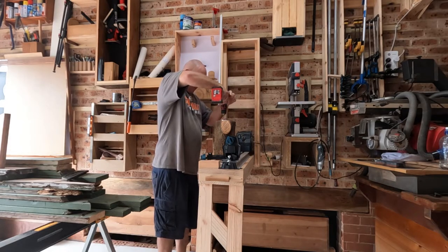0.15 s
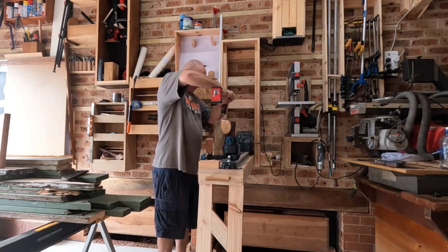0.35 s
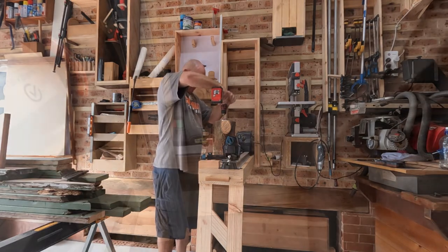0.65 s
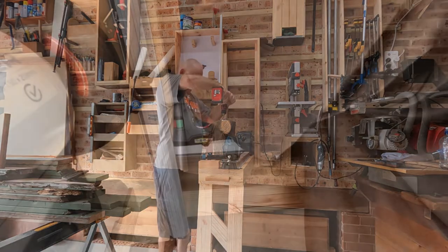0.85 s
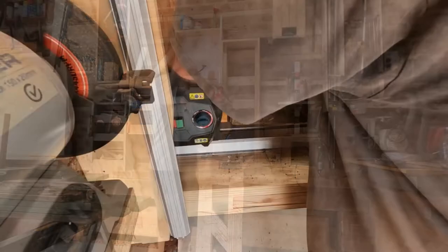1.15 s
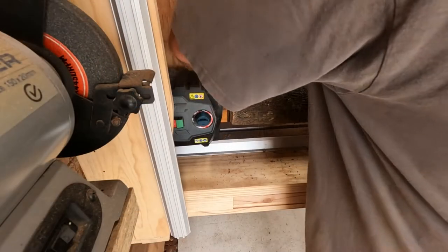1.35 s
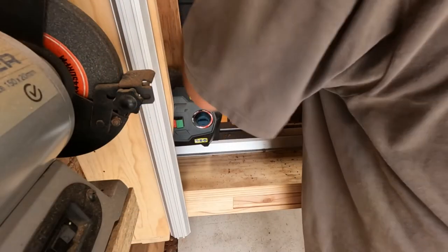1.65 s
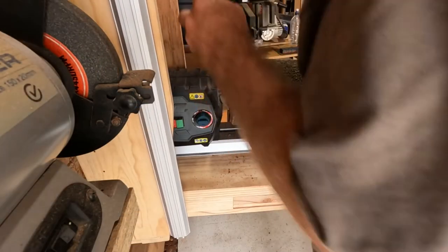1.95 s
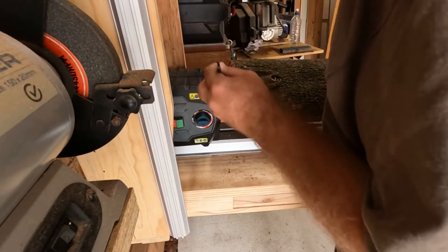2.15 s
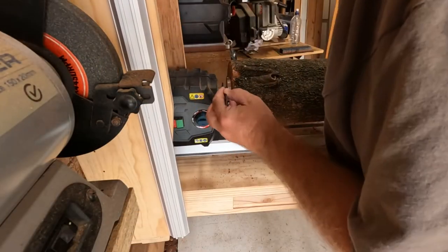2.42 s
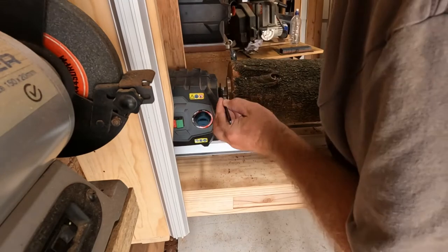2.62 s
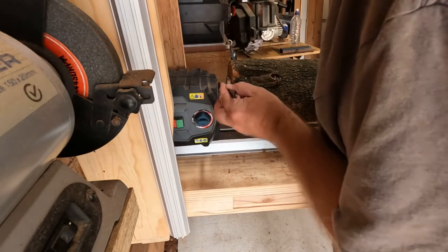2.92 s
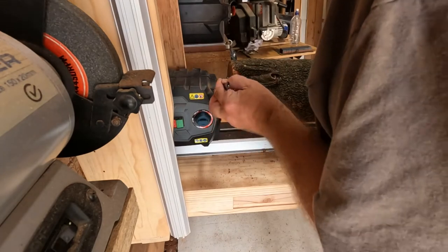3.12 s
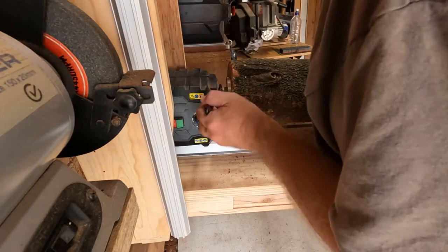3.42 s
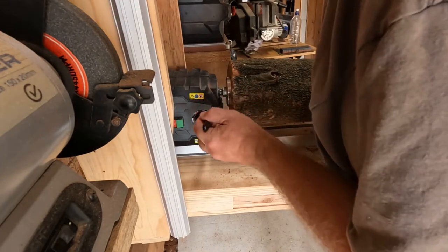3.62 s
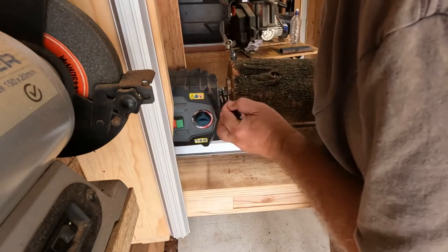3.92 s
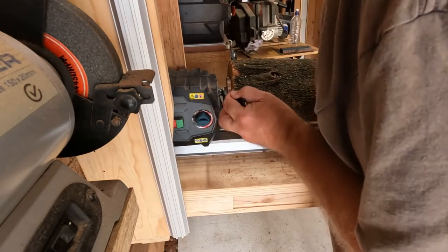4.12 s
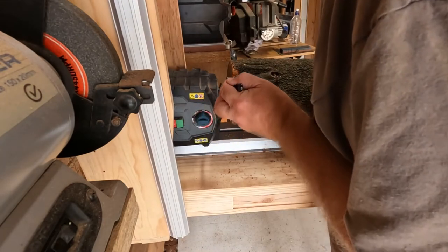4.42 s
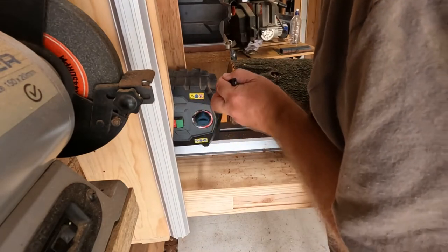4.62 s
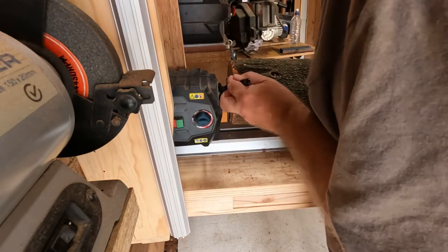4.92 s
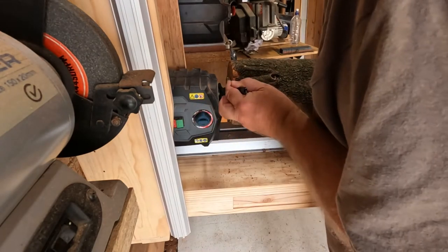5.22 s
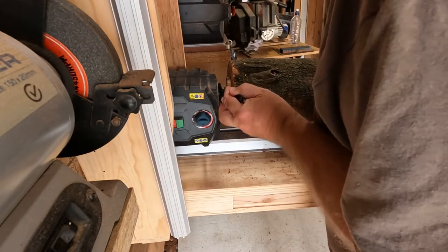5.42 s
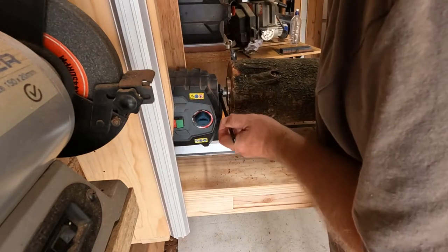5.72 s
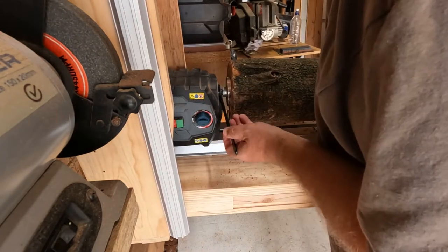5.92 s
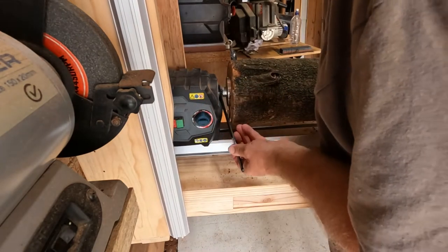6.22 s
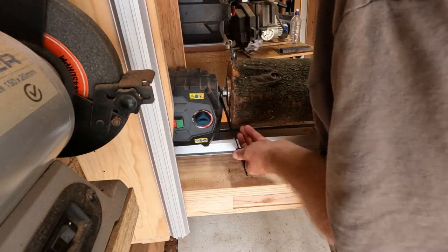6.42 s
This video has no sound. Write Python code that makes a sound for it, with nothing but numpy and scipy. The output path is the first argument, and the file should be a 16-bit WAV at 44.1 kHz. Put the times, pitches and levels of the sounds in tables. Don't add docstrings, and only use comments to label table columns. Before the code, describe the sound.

Irregular clunks, clicks and ringing metal taps on a timber bench, mixed with dry scraping and sliding over a low room rumble.

```python
import sys
import numpy as np
from scipy import signal
from scipy.fft import rfft, irfft, next_fast_len
from scipy.io import wavfile
from scipy.ndimage import uniform_filter1d, map_coordinates

SR = 44100
rng = np.random.default_rng(int(sys.argv[2]) if len(sys.argv) > 2 else 0)


def materialize(psi):
    bounded = np.clip(np.atleast_2d(psi).T, -1, 1)
    quanta = np.round(bounded * 32767).astype(np.int16)
    wavfile.write(sys.argv[1], SR, quanta)


def ratio(d):
    e = np.asarray(d, float) / 20
    return 10 ** e


N = 289296


def unit(x):
    return x / np.sqrt(np.mean(x ** 2) + 1e-20)


def along(points, hz):
    f, v = np.transpose(points)
    return np.interp(np.log(hz + 1), np.log(f + 1), v)


def gains(rows):
    s, *cols = np.transpose(rows)
    s = np.r_[s[0] - 0.012, s, s[-1] + 0.02]
    t = np.arange(N) / SR
    return np.array([np.interp(t, s, np.r_[0, ratio(c), 0]) for c in cols])


def wobble(rate_hz):
    knots = rng.standard_normal(int(N * rate_hz / SR) + 4)
    return map_coordinates(knots, [np.arange(N) * rate_hz / SR])


def stroke(s, attack_s, hold_s, release_s):
    corners_s = np.cumsum([s, attack_s, hold_s, release_s])
    return np.interp(np.arange(N) / SR, corners_s, [0, 1, 1, 0]) ** 2


def filtered(x, response):
    m = next_fast_len(N + SR // 2)
    return irfft(rfft(x, m) * response(np.fft.rfftfreq(m, 1 / SR)), m)[..., :N]


def treble(x, hz):
    return signal.sosfilt(signal.butter(3, hz, "high", fs=SR, output="sos"), x)


def ring(modes, scatter_db, size=4500):
    hz, db, t60_s = np.transpose(modes)[:, :, None]
    sign = (-1) ** np.arange(len(modes))[:, None]
    t = np.arange(size) / SR
    strength_db = db + scatter_db * rng.standard_normal(hz.shape)
    build_up = 1 - np.exp(-t * hz / 1.26)
    decay = ratio(strength_db - 60 * t / t60_s) * build_up
    return np.sum(sign * decay * np.sin(2 * np.pi * hz * t), axis=0)


# t/s, casing peak level/dB, board level/dB, casing f/Hz at the spot struck
KNOCKS = [(0.631, -37.5, -19, 805), (0.809, -21.5, 3.5, 875), (0.961, -9, -5.5, 882),
          (1.073, -28, -14, 850), (1.136, -21, 0, 873), (1.203, -15, -6.5, 750), (1.593, -23, -19, 1190),
          (1.612, -19.5, -5, 900), (1.625, -25.5, -2, 860), (1.641, -25.5, -8, 886),
          (1.777, -43.5, 2.5, 776), (2.366, -11, -5.5, 1403), (2.39, -21, -17, 940), (2.428, -21.5, 1, 746),
          (3.054, -32.5, -6, 1020), (3.419, -25, 6, 280), (3.539, -6.5, -7.5, 1430), (3.962, -27, -12, 820),
          (4.412, -32, -7.5, 535), (4.423, -28, -4.5, 534), (4.435, -25, -9, 985), (4.605, -35, -8, 800),
          (4.712, -27, -13, 1430), (4.85, -32, -8, 1460), (4.013, -36, -8, 756), (4.035, -37.5, -7, 900),
          (2.878, -33, -8, 940), (3.01, -38, -8, 1050), (4.255, -25, -8, 675), (4.505, -17, -2.5, 815),
          (4.627, -17, -18, 1436), (4.705, -23.5, -6, 805), (4.804, -27, -8, 790),
          (4.809, -26.5, -12, 1430), (4.824, -31.5, 1, 814), (5.66, -33.5, -3, 700)]
# t/s, casing peak level/dB, board level/dB, hardness/dB, casing f/Hz at the spot struck
RAPS = [(0.589, -29, -12.5, -9, 1420), (0.827, -17, 0, -13, 900), (0.999, -16, -14, -10, 1020),
        (1.291, -29, 0, -12, 810), (2.588, -28.5, -11, -13, 1010), (2.835, -13, -4.5, -7, 1384),
        (3.115, -12, -13.5, -6, 1123), (3.12, -10.5, -19, -8, 1110), (3.455, -32.5, -14, -5, 1130),
        (3.5, -20.5, -23, 3.5, 1460), (3.513, -34.5, -15, 9.5, 1450), (3.645, -11.5, -13, -6, 1543),
        (3.771, -35.5, -1, 9.5, 1430), (3.785, -19.5, -29, -4, 1006), (4.096, -38, -5, -6.5, 1500),
        (4.234, -25, 0, -11, 1093), (4.24, -26.5, -8, -3.5, 1070), (4.751, -32, -26, -16, 790),
        (4.786, -34.5, -20, -7, 1910), (4.88, -39, 0, -9, 885), (5.157, -39, -21, -11, 710),
        (5.206, -36, -15, -6, 1900), (5.792, -40, -16, -5.5, 1410), (5.889, -46.5, 1, -2, 716),
        (6.004, -43, -5, -5.5, 1430), (6.204, -44.5, -7, 0, 1430), (5.826, -43, -1, -7.5, 516)]
# f/Hz, level/dB, t60/s
BOARD = [(190.6, -21, 0.15), (264.5, -9.5, 0.085), (299, -2.5, 0.057), (378.7, 5.5, 0.073),
         (441, -6, 0.036), (529.4, -4.5, 0.082)]
CASING = [(662, -21.5, 0.053), (804.7, -1.5, 0.057), (967, 1.5, 0.023), (1089, -3.5, 0.038),
          (1222, -2.5, 0.021), (1430, -0.5, 0.024), (1747, -8.5, 0.024)]
EDGE = [(1875, -5.5, 0.036), (2009, -0.5, 0.029), (2150, -1.5, 0.03), (2390, 4, 0.02), (2710, 4, 0.016),
        (2981, -8, 0.04), (3230, -0.5, 0.016), (3538, -12, 0.025), (3864, -1.5, .018), (4380, -15, 0.017),
        (4620, -14, 0.023)]
WOOD_EDGE_DB, WOOD_TICK_DB = -19.5, -42
STEEL_TICK_DB, TICK_GROWS = -12, 1.8


def knocks():
    out, t = np.zeros(N + SR), np.arange(3000) / SR
    blows = [(s, db, board_db, WOOD_EDGE_DB, WOOD_TICK_DB, hz) for s, db, board_db, hz in KNOCKS]
    for s, db, board_db, hard_db, hz in RAPS:
        blows.append((s, db, board_db, hard_db, STEEL_TICK_DB + TICK_GROWS * hard_db, hz))
    for s, db, board_db, edge_db, tick_db, spot_hz in sorted(blows):
        contact = rng.standard_normal(len(t)) * np.exp(-t / 0.0038) * (1 - np.exp(-t / 0.0006))
        contact[20] = 2.5
        casing = CASING + [(spot_hz, 7, 0.035)]
        parts = [signal.fftconvolve(contact, ring(p, scatter_db=2.0)) for p in (BOARD, casing, EDGE)]
        tick = treble(uniform_filter1d(contact, size=3, origin=1), hz=4360)
        parts.append(np.pad(tick, (0, len(parts[0]) - len(t))))
        levels_db = (board_db + 2.0, 1.5, edge_db + 7.5, tick_db + 20.5)
        start = round((s - 0.002) * SR)
        for part, rel_db in zip(parts, levels_db):
            out[start:][:len(part)] += ratio(db + rel_db) * part / np.abs(part).max()
    return out[:N]


# f/Hz, level/dB, t60/s
CRANK = [(1860, 0, 0.062), (2093, 3, 0.063), (2557, 7, 0.13), (3000, -5.5, 0.11), (3510, 1.5, 0.14),
         (3680, -2, 0.13), (4340, -6.5, 0.23)]
SPINDLE = [(4850, 6, 0.07), (6310, -3, 0.11), (6880, -25, 0.05), (7400, -2, 0.14), (8350, -3, 0.1),
           (9400, -12, .1), (10060, -3, 0.11), (10200, -5, 0.2), (10500, -1, 0.078), (10970, -8, .1),
           (11700, -9, .12), (12600, -6, .08), (6530, -11, .15)]
# t/s, level/dB, f/Hz of the spot struck, answering width/octaves, t60 factor (1 = loosely held)
TAPS = [(.588, -37, 2560, .1, .25), (0.587, -43.5, 4850, .1, .45), (1, -25, 2600, .2, .2),
        (1.002, -32, 3900, .3, .15), (1.293, -39, 2560, .1, 0.2), (1.57, -30, 1880, .08, 1.2),
        (1.629, -30, 3800, 0.3, .3), (1.618, -32, 3950, 0.29, .2), (1.64, -29.5, 3700, .3, 0.28),
        (1.779, -51, 7900, .25, 1.1), (2.366, -10, 2054, 0.087, 0.18), (2.421, -34, 2980, .1, 1.0),
        (2.42, -34.5, 8500, 0.58, 0.39), (1.603, -34, 3920, 0.3, 0.22), (3.116, -7, 3000, 0.32, 0.21),
        (3.418, -49, 7400, .4, 1.0), (3.499, -22, 2590, 0.072, 0.88), (3.499, -13.5, 9700, 1.1, 0.78),
        (3.644, -2.5, 1930, 0.15, 0.27), (3.769, -29.5, 7100, 0.96, 1.3), (3.79, -29, 4344, .06, 1.4),
        (3.83, -42, 3510, 0.05, 3.3), (3.79, -44, 2300, .2, 3), (3.79, -47, 4850, .06, 2.8),
        (3.79, -40, 6600, .08, 2), (4.448, -34, 6170, .1, 0.43), (4.432, -35, 2400, .15, .5),
        (4.44, -38, 11100, .2, 0.61), (4.825, -42, 6300, .1, .4), (4.845, -30, 11900, .08, 0.8)]
REACH_DB = -19.5


def handle():
    out = np.zeros(N + SR)
    for s, db, spot_hz, octaves, free in TAPS:
        modes = []
        for hz, mode_db, t60_s in CRANK + SPINDLE:
            reach_db = REACH_DB * (np.log2(hz / spot_hz) / octaves) ** 2
            modes.append((hz, db + mode_db + reach_db, t60_s * free))
        out[round(s * SR):][:12000] += ring(modes, scatter_db=2.0, size=12000)
    return out[:N] * (0.8 + 0.6 * wobble(260))


def friction(parts, level, grit_db, lump_db):
    grit = rng.standard_normal(N) * ratio(grit_db * wobble(900) + lump_db * wobble(90))
    voices = [signal.fftconvolve(grit, ring(p, scatter_db=-1.0))[:N] for p in parts]
    hiss = filtered(treble(grit, hz=4200), lambda hz: ratio(-1.5 * np.log2(hz / 4000 + 0.1)))
    voices.append(hiss)
    return sum(g * unit(v) for g, v in zip(level, voices))


# t/s, length/s, casing level/dB, grit/dB
SCRAPES = [(0.599, 0.1, -48.5, 6.5), (0.84, 0.09, -50.5, 6.5), (1.004, 0.072, -42, 2),
           (1.062, 0.071, -36.5, 0.5), (1.25, 0.062, -50, 7), (1.281, 0.093, -41.5, -5.5),
           (1.559, 0.05, -35.5, 1.5), (1.613, 0.04, -37.5, 9), (0, 0.17, -55, 12), (2.323, 0.038, -53, -11),
           (2.411, 0.019, -33.5, 8), (2.423, 0.075, -43, -5), (2.543, 0.098, -42, -5),
           (2.84, 0.07, -45.5, 6.5), (3.398, 0.043, -47, -5), (3.444, 0.06, -40, 1),
           (3.495, 0.045, -29.5, 16.5), (3.56, 0.13, -32.5, 0), (3.646, 0.13, -40.5, 6),
           (3.773, 0.043, -28.5, 13), (3.988, .1, -49, -11), (4.23, 0.055, -35, -7), (4.41, 0.05, -35, 7.5),
           (4.721, .06, -43.5, 1), (4.855, .045, -42.5, 0.5), (4.584, 0.13, -43, -5.5),
           (4.697, 0.08, -40, -2.5), (4.767, 0.08, -37.5, 2.5), (4.825, 0.066, -38, 3.5),
           (5.194, 0.046, -47.5, -11), (5.77, 0.084, -44.5, 0), (4.27, 0.059, -52, 0)]
SCRAPE_DB = [0.5, 0, -7.5, -15.5]
GRIT_SHARE = [-0.42, -0.024, 0.28, 1.03]


def scrapes():
    level = np.zeros((4, N))
    for s, length_s, db, grit_db in SCRAPES:
        u = np.arange(round(length_s * SR)) / (length_s * SR)
        swell = np.sin(np.pi * u) ** 0.77
        part_db = db + np.add(SCRAPE_DB, np.multiply(GRIT_SHARE, grit_db))
        level[:, round(s * SR):][:, :len(swell)] += ratio(part_db)[:, None] * swell
    held = [[(hz, db * 0.6, t60_s * 0.69) for hz, db, t60_s in p] for p in (BOARD, CASING, EDGE)]
    return friction(held, level, grit_db=3.5, lump_db=1.7)


# t/s, rasp level/dB
DRAG = [
    (2.93, -58),
    (3.02, -56.5),
    (3.07, -54),
    (3.108, -32.5),
    (3.145, -34),
    (3.2, -37),
    (3.24, -47),
    (3.36, -68.5),
]
# f/Hz, level/dB, t60/s
RAIL = [
    [(188.6, 0, 0.066)],
    [(813, 7, 0.014), (1020, 3, 0.028), (1140, -1, 0.027), (1600, -19, .03)],
    [(2170, 0, 0.017), (2420, 1.5, 0.011), (2630, 2.5, 0.014), (3000, -7, 0.0093), (3300, -9, 0.011),
     (3860, -21, 0.0087), (4560, -3.5, 0.0077), (1780, -11, .015)],
]
DRAG_HISS_DB = -20
DRONE_S, DRONE_ATTACK_S, DRONE_HOLD_S, DRONE_RELEASE_S, DRONE_DB = 2.94, 0.053, 0.19, 0.033, -38
JAM_S, JAM_DB, JAM_RISE_DB_PER_S, JAM_FALL_DB_PER_S = 3.108, -31, 209, 159


def clamp():
    speed, = gains(DRAG)
    late_s = np.arange(N) / SR - JAM_S
    shell = ratio(JAM_DB + np.minimum(JAM_RISE_DB_PER_S * late_s, -JAM_FALL_DB_PER_S * late_s))
    drone = ratio(DRONE_DB) * stroke(DRONE_S, DRONE_ATTACK_S, DRONE_HOLD_S, DRONE_RELEASE_S)
    level = [drone, shell, speed, ratio(DRAG_HISS_DB) * speed]
    return friction(RAIL, level, grit_db=2.5, lump_db=1)


# t/s, hold/s, weight level/dB, grit level/dB
PUSHES = [
    (3.5, 0.126, -32.5, -43.5),
    (5.928, 0.491, -41, -45),
    (6.498, .1, -50, -42),
]
PUSH_GRIT_DB = [3, -10, -6.5]
# f/Hz, level/dB, t60/s
BENCH = [
    [(210, -2.5, 0.029), (256, 0, 0.039), (354.6, 2.5, .035), (378, -2.5, 0.026)],
    [(519, 0, 0.09), (730, -1, 0.02), (910, 3.5, 0.017), (1130, -4.5, 0.014), (1430, 3, 0.02),
     (1920, -4.5, 0.017), (2935, -5, 0.022), (3700, -14.5, 0.026), (5670, -16, .015)],
]


def pushes():
    level = np.zeros((4, N))
    for s, hold_s, weight_db, grit_db in PUSHES:
        part_db = [weight_db, *np.add(grit_db, PUSH_GRIT_DB)]
        level += ratio(part_db)[:, None] * stroke(s, 0.068, hold_s, 0.044)
    return friction(BENCH + [EDGE], level, grit_db=2.5, lump_db=1.7)


# t/s, length/s, first f/Hz, last f/Hz, level/dB
SQUEAKS = [(0, 0.14, 1730, 1725, -51.5), (0.125, 0.22, 1720, 1720, -57.5), (0, 0.19, 2970, 3200, -56),
           (0, 0.25, 4340, 4260, -58), (.01, 0.15, 5900, 6400, -62), (0, .08, 5300, 5900, -64),
           (0.132, .09, 6250, 6200, -69), (.375, 0.09, 5400, 5150, -67), (0.381, .06, 2500, 2610, -62),
           (.54, .04, 2150, 2250, -61), (4.976, 0.095, 3150, 3060, -62), (5.067, .07, 2670, 2600, -64),
           (6.396, 0.089, 2850, 3320, -54), (6.483, 0.074, 4250, 4250, -60),
           (6.518, .04, 3400, 3600, -54.5)]
SHIVER = 0.016


def squeaks():
    out, shiver, flutter = np.zeros(N), wobble(300), wobble(260)
    for s, length_s, hz0, hz1, db in SQUEAKS:
        u = np.arange(round(length_s * SR)) / (length_s * SR)
        luck = rng.integers(N - SR) + np.arange(len(u))
        hz = hz0 + (hz1 - hz0) * u + SHIVER * hz0 * shiver[luck]
        phase = 2 * np.pi * np.cumsum(hz) / SR
        swell = np.sin(np.pi * u ** 0.5) ** 0.6
        tone = ratio(db + 2.5) * (0.8 + 0.9 * flutter[luck]) * swell * np.sin(phase)
        start = round(s * SR)
        out[start:][:len(u)] += tone[:N - start]
    return out


# f/Hz, t60/s
WALLS = [(150, 0.64), (500, 0.47), (1500, 0.43), (4000, 0.42), (10000, 0.13)]


def walls(x):
    out, step = np.zeros(N + SR), SR // 5
    x = x * (0.6 + 0.8 * wobble(400))
    for i in range(0, N, step):
        hz, t, z = signal.stft(rng.standard_normal(SR // 2), SR, nperseg=256)
        decay = ratio(-60 * t / along(WALLS, hz)[:, None])
        tail = signal.istft(z * decay, SR, nperseg=256)[1]
        wet = signal.fftconvolve(x[i:i + step], tail / np.linalg.norm(tail))
        start = i + 300
        out[start:][:len(wet)] += wet[:len(out) - start]
    return out[:N]


# t/s, level/dB
HUM = [
    (0, -54.5),
    (1, -51),
    (1.6, -51.5),
    (2.75, -48.5),
    (3.4, -48),
    (4.2, -49),
    (5.2, -51),
    (6, -47.5),
    (6.56, -47.5),
]
# f/Hz, level per Hz/dB
RUMBLE = [(25, -45), (50, -19.5), (80, -8), (120, -1), (200, -2), (300, -9), (450, -37)]
# f/Hz, level per Hz/dB
AIR = [(150, -35.5), (300, -1.5), (600, -1), (1000, -8), (2000, -11), (4000, -20), (6300, -27.5),
       (13000, -31)]
AIR_DB = -50.5


def hum():
    def noise(shape):
        return unit(filtered(rng.standard_normal(N), lambda hz: ratio(along(shape, hz))))

    level, = gains(HUM)
    rumble = level * ratio(1.3 * wobble(9)) * noise(RUMBLE)
    air = ratio(AIR_DB) * ratio(0.6 * wobble(9)) * noise(AIR)
    return rumble + air


def scene():
    wood = knocks() + scrapes() + clamp() + pushes()
    bench = treble(wood, hz=145) + handle() + squeaks()
    return (bench + ratio(-15) * walls(bench) + hum())[None]


def band_limit(x):
    return signal.sosfilt(signal.butter(12, 13730, fs=SR, output="sos"), x)


# f/Hz, level/dB
MIC = [(5000, 0), (7000, -7), (8000, -15.5), (8700, -22), (9150, -42), (9500, -22.5), (10500, -16),
       (12400, -15), (13000, -35.5), (13700, -24)]


def record(dry):
    limited = dry / (1 + np.abs(dry / 0.9) ** 4) ** 0.25
    mix = filtered(limited, lambda hz: ratio(along(MIC, hz)))
    return band_limit(mix)


dry = scene()
out = record(dry)
materialize(out)
```